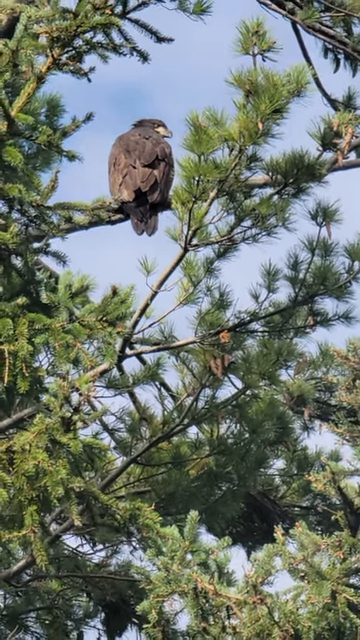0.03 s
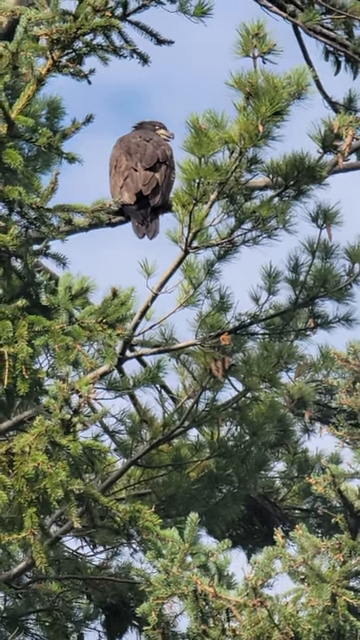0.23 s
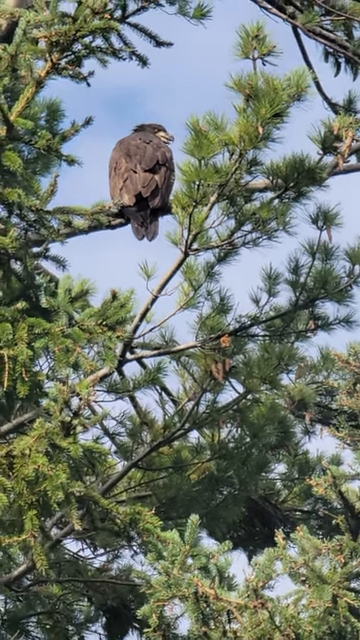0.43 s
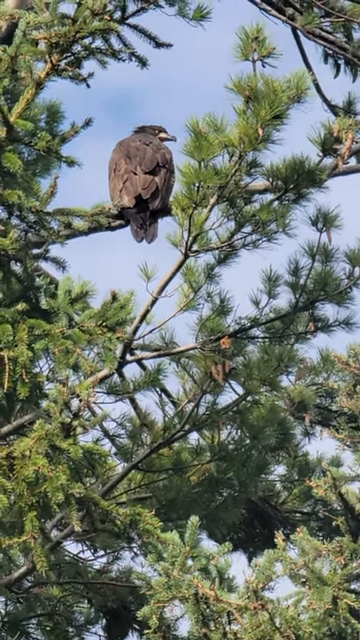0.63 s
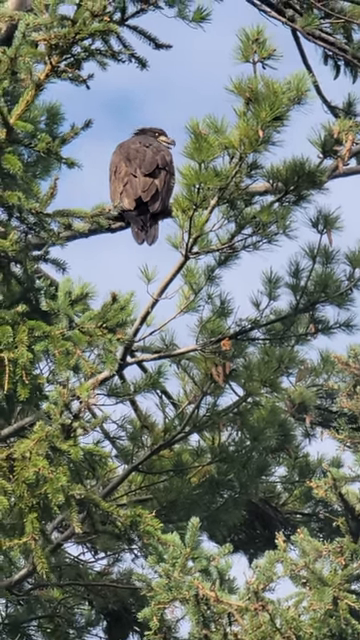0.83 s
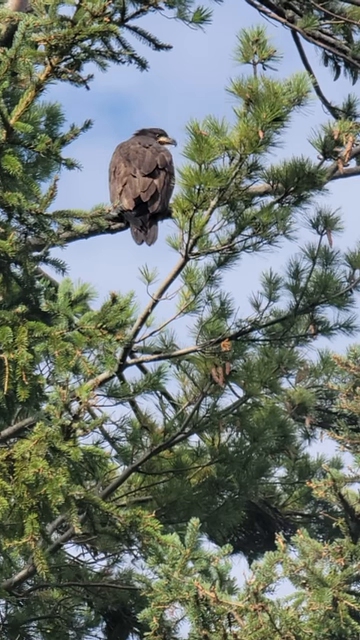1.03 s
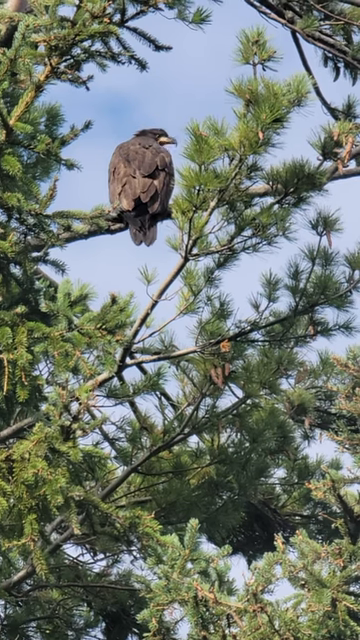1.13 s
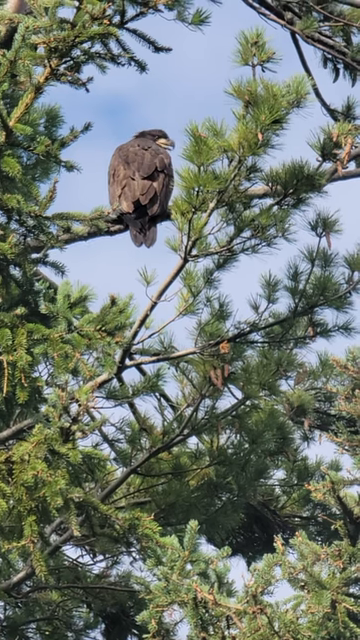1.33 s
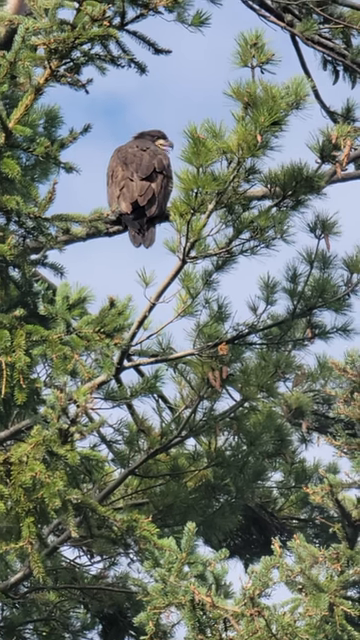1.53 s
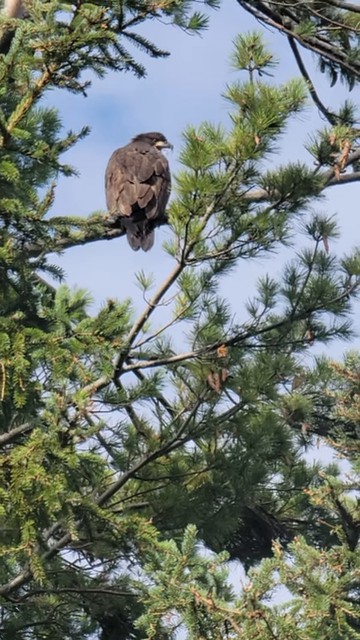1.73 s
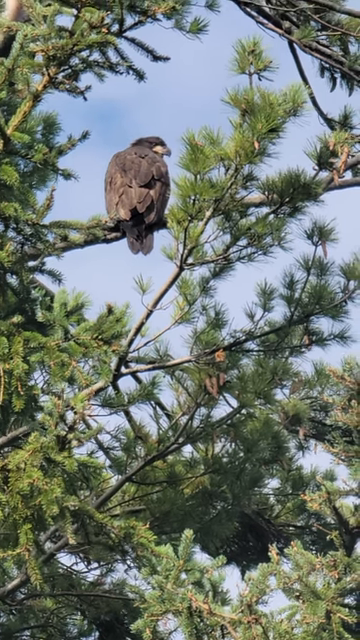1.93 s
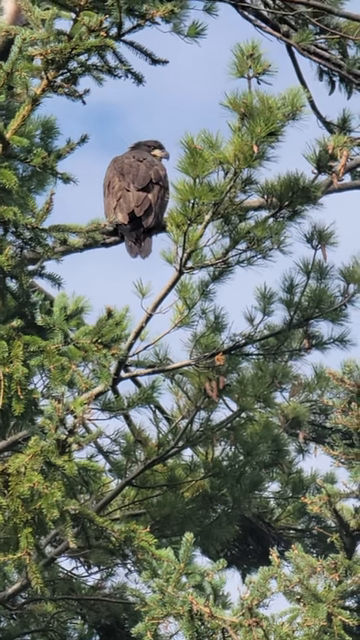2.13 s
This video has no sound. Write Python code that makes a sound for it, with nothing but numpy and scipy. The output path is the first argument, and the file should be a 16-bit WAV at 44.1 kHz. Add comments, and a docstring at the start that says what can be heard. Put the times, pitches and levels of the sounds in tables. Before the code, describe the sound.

Two eagles trade high whistles that break upward and drop, echoing through pines. Earlier cries still ring at the start. The farther bird calls at about 0.2, 0.9 and 1.5 seconds, with a thin squeak at 0.5. The near bird yelps at 0.2, then gives louder, slightly creaky cries at 0.6, 1.1 and 1.7. Light wind rumbles throughout, and a faint distant engine hum sinks halfway through.

```python
"""Light wind, a distant engine's hum and the ring of earlier cries hang among tall pines.
Then two eagles call in turn, one farther off and one near. Each cry is a whistle that breaks upward
through three registers, arches over and drops out in a short low note. The near bird adds a yelp and
opens its cries with a creak; the far one adds a thin squeak. The trees scatter it all into a long tail."""
import sys
import numpy as np
from scipy import signal
from scipy.fft import rfft, irfft, next_fast_len
from scipy.io import wavfile
from scipy.ndimage import map_coordinates

SR = 44100
rng = np.random.default_rng(int(sys.argv[2]) if len(sys.argv) > 2 else 0)


def dump_mix(stems):
    """Bounce the given channels to the path in sys.argv[1] as a 16-bit WAV at rate SR."""
    frames = np.atleast_2d(stems).T  # one column per channel
    limited = np.clip(frames, -1, 1)  # hard clip at full scale
    pcm = np.round(limited * 32767).astype(np.int16)
    wavfile.write(sys.argv[1], SR, pcm)


N = 97020
PRE_ROLL = SR // 2  # samples before the start, for cries that still ring

# EQ of the wind's rumble and of its hiss: (frequency [Hz], level [dB])
RUMBLE_EQ = [(20, -31), (30, -17), (45, -6), (70, 0), (110, -0.5), (160, -12), (260, -15.5), (400, -22.5),
             (620, -35.5), (1200, -38), (3000, -59.5)]
HISS_EQ = [(100, -10.5), (600, -7), (850, -2), (1250, -1.5), (1800, -21), (4000, -5.5), (7000, -15),
           (8500, -35), (10500, -32.5), (12500, -26.5), (15500, -22.5)]
# stereo image of the wind: (frequency [Hz], left-right likeness [0-1])
WIND_LIKENESS = [(60, 1), (130, 0.47), (290, 0.93), (640, .6), (1400, 0.78), (3100, 0), (7000, 0)]
# fader ride of the engine hum: (time [s], level [dB])
HUM_RIDE = [(0, -44.5), (0.252, -50.5), (0.449, -45.5), (0.618, -50.5), (1.03, -49), (1.101, -58),
            (1.33, -54), (1.552, -68.5), (2.2, -61.5)]

# reverb layers from the trees: (level [dB], pre-delay [s], build-up [s], t60 up to 3 kHz [s])
FAR_REVERB = [(-8, 0, 0.0033, 0.083), (-6, 0.09, 0.0052, 0.5), (3.5, .0, 0.021, 1.87)]
NEAR_REVERB = [(-2, 0, 0.0033, 0.17), (-18.5, 0.14, 0.0072, 0.51), (-9, 0.0076, 0.021, 1.23)]
# colour of the tail: (frequency [Hz], level [dB])
TAIL_EQ = [(1400, -8), (1900, -4.5), (2400, -8.5), (2650, -0.5), (2850, 5), (3050, -2.5), (3400, 0.5),
           (3900, -2), (5000, 1.5), (6300, 5), (8000, -6)]
# phase between the microphone ports: (frequency [Hz], lead of the left [rad])
LEFT_LEAD = [(100, 0), (2100, .5), (2600, .3), (3300, .7), (4400, 1.7), (4900, 2.1), (5300, 2.4),
             (5800, 4.2), (7000, 4.8)]

# cries: (start [s], low note length [s], middle length [s], top rise [s], top fall [s],
#   middle from [Hz], middle to [Hz], top from [Hz], crest [Hz], top end [Hz],
#   low end level [dB], middle end level [dB], crest level [dB], tremble [0-1], overtone boost [dB])
FAR_CUES = [ (-.42, .03, .09, .135, .045, 2300, 2490, 3050, 3450, 2950, -50.5, -76, -44, 0.089, -26),
            (.152, .036, .109, .153, .042, 2170, 2390, 2980, 3460, 2850, -47.5, -38, -40, 0.085, 1),
            (.850, .030, .088, .132, .042, 2300, 2480, 3050, 3400, 3080, -48.5, -34, -37, 0.12, -1.5),
            (1.512, .028, .077, .138, .045, 2320, 2530, 3060, 3440, 3100, -46.5, -35.5, -41, 0.063, 1.5)]
NEAR_CUES = [ (-.40, .018, .07, .07, .05, 2200, 2420, 2750, 2880, 2600, -31.5, -33, -33, 0.5, -9.5),
             (.604, .015, .090, .039, .050, 2130, 2380, 2770, 2865, 2490, -35.5, -28, -26.5, 0.3, 8),
             (1.113, .020, .063, .072, .060, 2220, 2410, 2650, 2875, 2420, -37.5, -29, -27, 1, 1.5),
             (1.684, .018, .055, .073, .049, 2280, 2440, 2570, 2820, 2390, -35.5, -25.5, -28, 0.6, 3.5)]
# tone of the low, middle and top register:
#   (2nd harmonic [dB], 3rd harmonic [dB], pitch jitter [share], swell [dB], overtone drift [dB])
FAR_REGISTERS = [(-4, -14, 0.0042, 8.2, 1), (-8.5, -24, 0.0017, 8.1, -4.5), (-15.5, -69, 0.0031, 3.9, -2.5)]
NEAR_REGISTERS = [(-4.5, -13, 0.0097, 7.5, -0.5), (-11.5, -37.5, 0.0067, 1.5, -13.5),
                  (-27.5, -56, 0.0034, 1, 2)]
# contours of the far squeak and the near yelp (timed from its cue): (time [s], pitch [Hz], level [dB])
SQUEAK_CONTOUR = [(.485, 3686, -79), (.505, 3700, -65.5), (.53, 3950, -53)]
YELP_CONTOUR = [(0, 2580, -17), (.013, 2745, -12), (.025, 2680, -5), (.052, 2530, 1), (.066, 2490, -5),
                (.075, 2470, -3), (.089, 2410, -10)]
# yelp cues: (start [s], gain [dB])
YELP_CUES = [(0.197, -25.5)]
# harmonics of yelp and creak, fundamental first: (level [dB])
YELP_TONE = [2, -8, -45, -46.5]
CREAK_TONE = [-25, -16, -10, -1, -3, -3.5, -12]
# slapbacks off nearby trunks: (delay [s], level [dB])
TRUNK_ECHOES = [(0.023, -14.5), (0.038, -21.5), (0.114, -24.5), (0.163, -29.5)]

FADE_DB = -2.5  # fade along a top note's fall, a closing drop or a creak


def amp(db):
    """Decibels to gain."""
    return 10 ** (np.asarray(db) / 20)


def along(points, hz):
    """Read (frequency, value) points on a log axis."""
    f, v = np.transpose(points)
    return np.interp(np.log(hz + 1), np.log(f + 1), v)


def wobble(rate, size):
    """A smooth random modulator, rate knots a second."""
    knots = rng.standard_normal(4096)
    return map_coordinates(knots, [np.arange(size) * rate / SR], mode="wrap")


def filtered(x, response):
    """Run x through a frequency response."""
    m = next_fast_len(x.shape[-1] + SR // 4)
    return irfft(rfft(x, m) * response(np.fft.rfftfreq(m, 1 / SR)), m)[..., :x.shape[-1]]


def ramp(seconds):
    """0 to 1 over a length of time."""
    return np.linspace(0, 1, max(int(seconds * SR), 8))


def contour(rows):
    """Pitch and level per sample from breakpoints."""
    s, hz, db = np.transpose(rows)
    t = np.arange(s[0], s[-1], 1 / SR)
    return np.interp(t, s, hz), np.interp(t, s, db)


def add(track, start, sound):
    """Mix a sound into a track at its cue time."""
    i = max(PRE_ROLL + int(start * SR), 0)
    track[i:i + len(sound)] += sound[:max(len(track) - i, 0)]


def noise_bed(eq):
    """Mid-side noise of rms 1, widest in the treble."""
    def response(hz):
        width = np.arccos(np.clip(along(WIND_LIKENESS, hz), -1, 1)) / 2
        return amp(along(eq, hz)) * [np.cos(width), np.sin(width)]
    mid, side = filtered(rng.standard_normal((2, N)), response)
    stereo = np.array([mid + side, mid - side])
    return stereo / np.sqrt(np.mean(stereo ** 2))


def wind():
    """A low rumble that swells a little, under a faint even hiss."""
    rumble = amp(-53.5 + 1.2 * wobble(7.95, N)) * noise_bed(RUMBLE_EQ)
    return rumble + amp(-62.5) * noise_bed(HISS_EQ)


def engine(pitch_hz=123):
    """A distant hum that sinks halfway through, with a faint steady octave."""
    ride_db = np.interp(np.arange(N) / SR, *np.transpose(HUM_RIDE))
    phase = 2 * np.pi * np.cumsum(pitch_hz * (1 + 0.008 * wobble(18, N))) / SR
    hum = amp(ride_db + wobble(15, N)) * np.sin(phase)
    octave = amp(-67.5 + 0.67 * wobble(4.4, N)) * np.sin(2 * phase)
    return np.sqrt(2) * (hum + octave)


def forest(x, layers):
    """Direct sound at two microphone ports, plus scatter from close branches and distant trunks."""
    hz, t, noise = signal.stft(rng.standard_normal((2, 3 * SR // 2)), SR, nperseg=256)
    damping = np.maximum(hz, 3000)[:, None] / 3000  # the treble dies sooner
    power = 0
    for db, delay_s, build_s, t60 in layers:
        age = np.maximum(t - delay_s, 0)
        envelope = ((1 - np.exp(-age / build_s)) * amp(-60 * age * damping / t60)) ** 2
        power = power + amp(db) ** 2 * envelope / (envelope[0].sum() * t[1] * SR)
    colour = amp(along(TAIL_EQ, hz))[:, None]
    impulse = signal.istft(noise * np.sqrt(power) * colour, SR, nperseg=256)[1]
    direct = filtered(x, lambda f: np.exp(.5j * np.outer([1, -1], along(LEFT_LEAD, f))))
    wet = signal.fftconvolve(x[None], impulse, axes=1)[:, :len(x)]
    return (direct + wet)[:, PRE_ROLL:]


def whistle(hz, db, harmonics, jitter, drift_db=0, edge_s=0.0031, flutter_per_s=121.1, air_hz=707):
    """One register of the syrinx: an unsteady, airy note whose overtones shift by drift_db."""
    edge = int(edge_s * SR)
    hz, db = np.pad(hz, (0, edge), "edge"), np.pad(db, (0, edge), "edge")
    n = len(hz)
    phase = 2 * np.pi * np.cumsum(hz * (1 + jitter * wobble(320, n))) / SR
    bright_db = 0.27 * (db - db.max()) + drift_db * np.linspace(0, 1, n)  # louder is brighter
    wave = 0
    for k, level in enumerate(harmonics, 1):
        overtone_db = bright_db + 3.5 * wobble(flutter_per_s, n)
        wave = wave + amp(level + (k > 1) * overtone_db) * np.exp(1j * k * phase)
    # a band of breath round each partial
    air = 1 + amp(-44.5) * (wobble(2 * air_hz, n) + 1j * wobble(2 * air_hz, n))
    to_edge = np.minimum(np.arange(n), np.arange(n)[::-1])
    gate = np.sin(np.pi / 2 * np.clip(to_edge / edge, 0, 1)) ** 2
    flutter_db = 2.92 * np.tanh(wobble(flutter_per_s, n))
    waver_db = 2 * np.tanh(wobble(55, n))
    return (wave * air).real * gate * amp(db + flutter_db + waver_db)


def tremble(hz, db, depth, rate_hz=62):
    """A fast shake in pitch and level that eases as the note settles."""
    n = len(hz)
    phase = 2 * np.pi * np.cumsum(rate_hz * (1 + .15 * wobble(60, n))) / SR
    shake = depth * np.linspace(1, .5, n) * np.sin(phase)
    return hz * (1 + 0.071 * shake), db + 2.5 * shake


def hoarseness(fall, depth_db=0.5):
    """A slight grain in the level that grows along the fall."""
    return depth_db * fall * np.tanh(wobble(341.5, len(fall)))


def drop(call_db, pitch_hz=2095, sag=0.911):
    """The short, rough low note in which a call gives out."""
    u = ramp(0.016)
    return whistle(pitch_hz * sag ** u, call_db - 17.5 + FADE_DB * u, [0, -13, -26], jitter=.035)


def cries(cues, registers, bend, low_from, low_to):
    """The voice breaks from low to middle to top note; a larger bend makes the top climb later."""
    track = np.zeros(PRE_ROLL + N)
    low_swell, mid_swell, top_swell = [row[3] for row in registers]
    for (start, low_s, mid_s, rise_s, fall_s, mid_from, mid_to, top_from, crest, top_end,
         low_db, mid_db, crest_db, shake, boost_db) in cues:
        low, mid, rise, fall = ramp(low_s), ramp(mid_s), ramp(rise_s), ramp(fall_s)
        low_note = low_from + (low_to - low_from) * low, low_db + low_swell * (low - 1)
        scoop = 1 - .07 * np.exp(-mid * mid_s / .005)  # slides in from below
        mid_hz = (mid_from + (mid_to - mid_from) * mid ** 1.1) * scoop
        rise_hz = top_from + (crest - top_from) * np.sin(np.pi / 2 * rise ** bend)
        fall_hz = crest + (top_end - crest) * fall ** 1.74
        arch_db = np.r_[top_swell * (rise - 1), FADE_DB * fall + hoarseness(fall)]
        top_note = np.r_[rise_hz, fall_hz], crest_db + arch_db
        mid_note = tremble(mid_hz, mid_db + mid_swell * (mid - 1), shake)
        for (hz, db), register in zip([low_note, mid_note, top_note], registers):
            second_db, third_db, jitter, _, drift_db = register
            harmonics = [0, second_db + boost_db, third_db + boost_db]
            add(track, start, whistle(hz, db, harmonics, jitter, drift_db))
            start += len(hz) / SR
        add(track, start, drop(crest_db))
    return track


def far_eagle():
    """The higher, longer cries and one thin squeak."""
    track = cries(FAR_CUES, FAR_REGISTERS, bend=2.1, low_from=1472, low_to=1740)
    squeak = whistle(*contour(SQUEAK_CONTOUR), [-10, -2], jitter=0.0017)
    add(track, SQUEAK_CONTOUR[0][0], squeak)
    return track


def near_eagle(creak_hz=657, creak_db=-39):
    """A short yelp, and full cries that each open with a rising creak."""
    track = cries(NEAR_CUES, NEAR_REGISTERS, bend=1.3, low_from=1413, low_to=1626)
    for start, *_ in NEAR_CUES:
        u = ramp(.019)
        creak = whistle(creak_hz * 1.08 ** u, creak_db + FADE_DB * u, CREAK_TONE, jitter=.014)
        add(track, start - .01, creak)
    for start, db in YELP_CUES:
        hz, shape_db = contour(YELP_CONTOUR)
        add(track, start, whistle(hz, db + shape_db, YELP_TONE, jitter=.004))
        add(track, start + len(hz) / SR, drop(db))
    return track


def trunks(x):
    """Slapbacks off nearby trunks beat against the gliding note."""
    def echoes(hz):
        return sum(amp(db) * np.exp(-2j * np.pi * hz * delay_s) for delay_s, db in TRUNK_ECHOES)
    return x + filtered(x, echoes)


def scene():
    """Both birds in the trees, over a bed of wind and hum that leans slightly right."""
    near = forest(trunks(near_eagle()), NEAR_REVERB)
    far = forest(far_eagle(), FAR_REVERB)
    bed = (wind() + engine()) * amp([[-.3], [.3]])
    return near + far + bed


def record(dry, cutoff_hz=15750):
    """A brick-wall high cut on the mix."""
    return filtered(dry, lambda hz: hz < cutoff_hz)


dry = scene()
out = record(dry)
dump_mix(out)
```